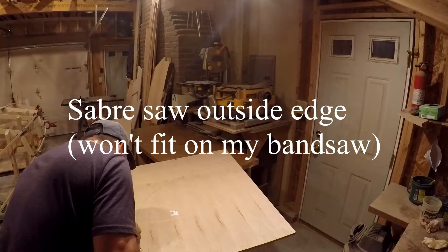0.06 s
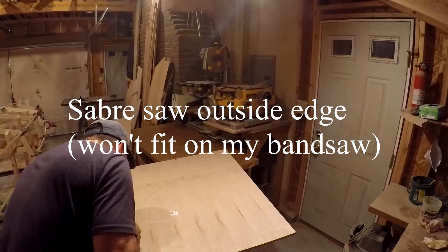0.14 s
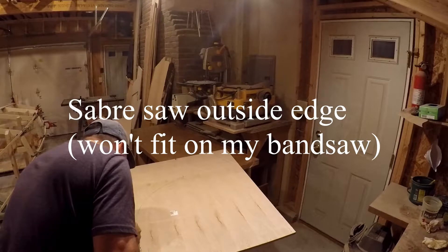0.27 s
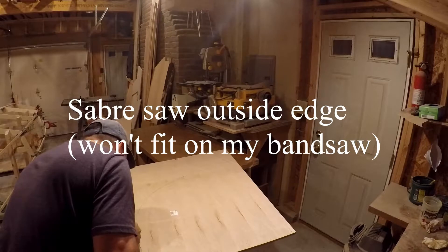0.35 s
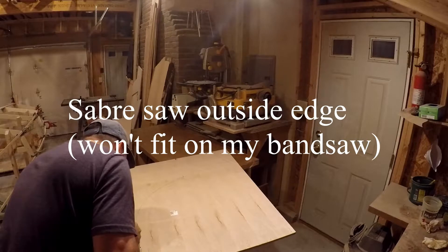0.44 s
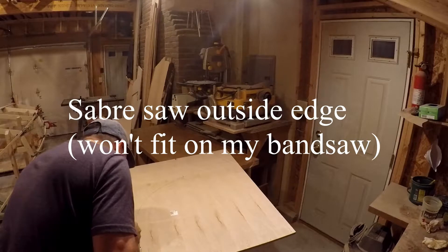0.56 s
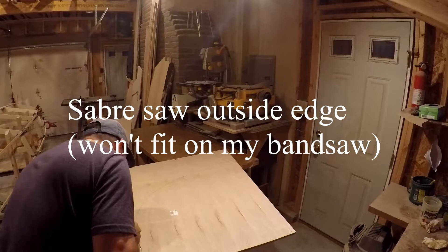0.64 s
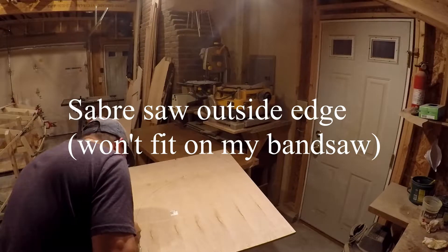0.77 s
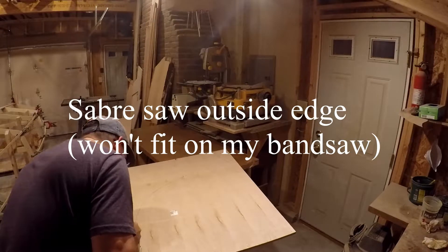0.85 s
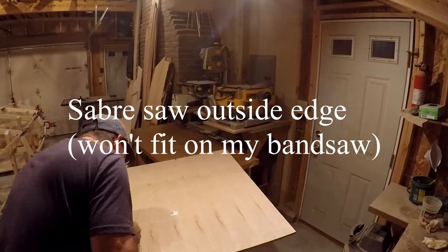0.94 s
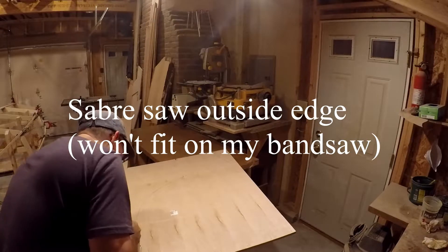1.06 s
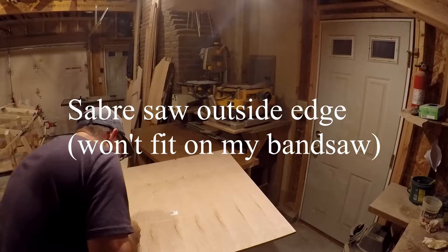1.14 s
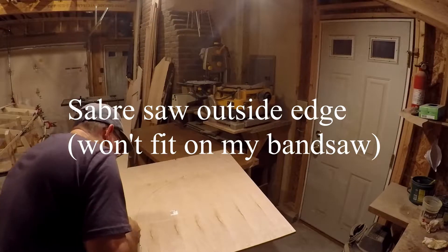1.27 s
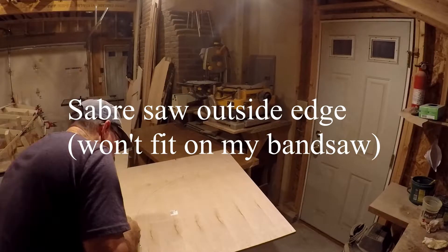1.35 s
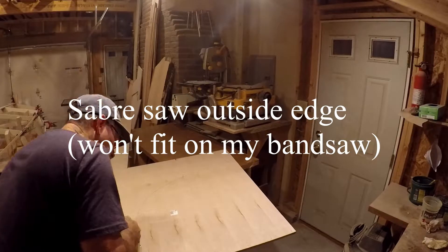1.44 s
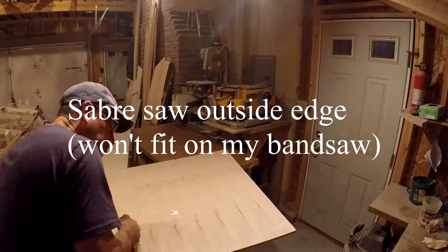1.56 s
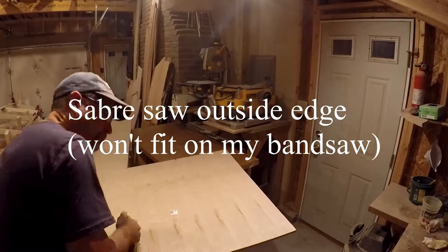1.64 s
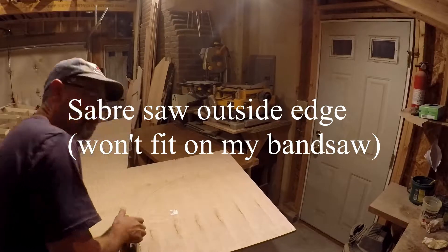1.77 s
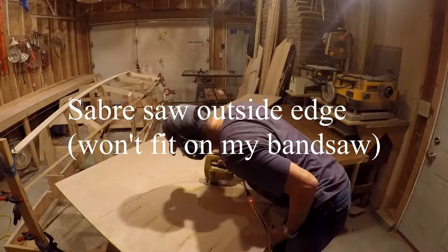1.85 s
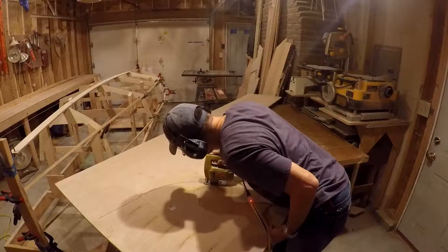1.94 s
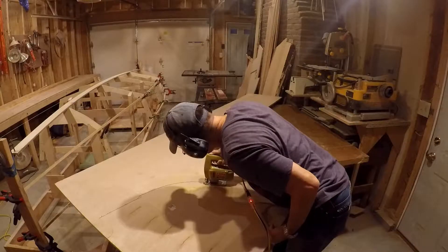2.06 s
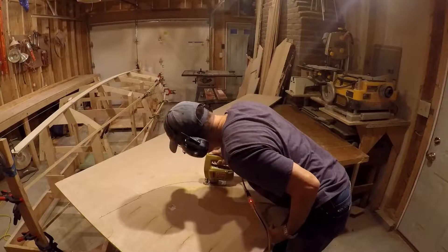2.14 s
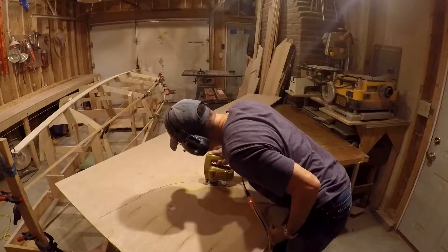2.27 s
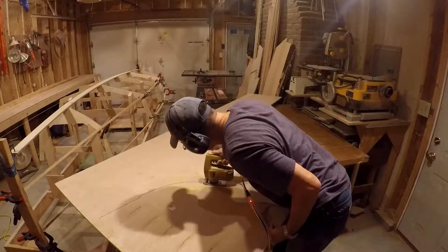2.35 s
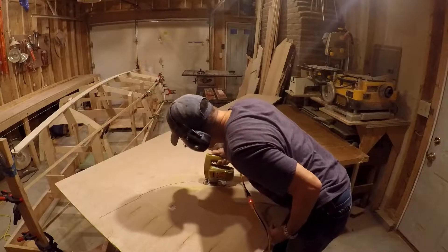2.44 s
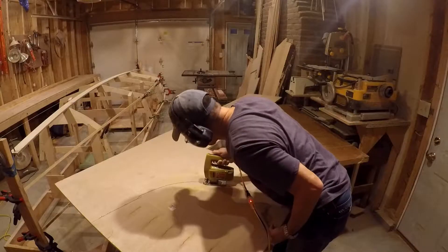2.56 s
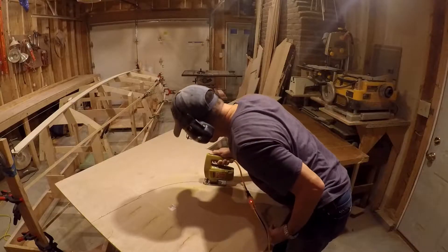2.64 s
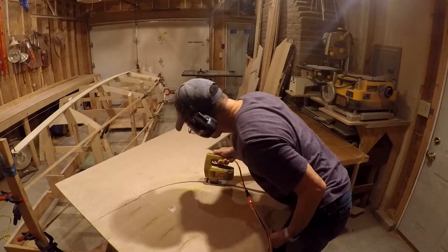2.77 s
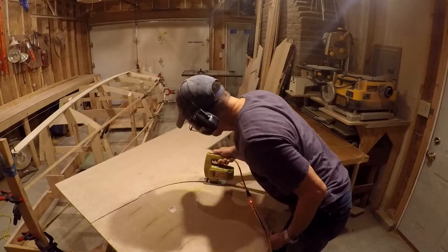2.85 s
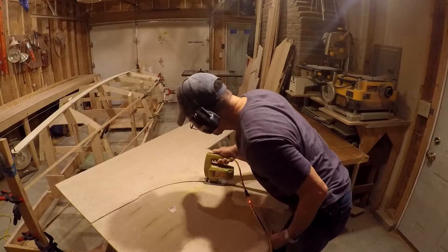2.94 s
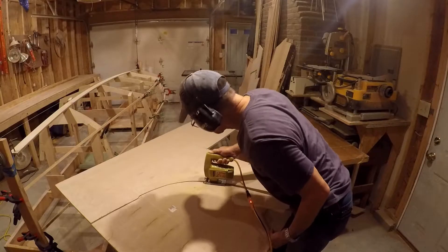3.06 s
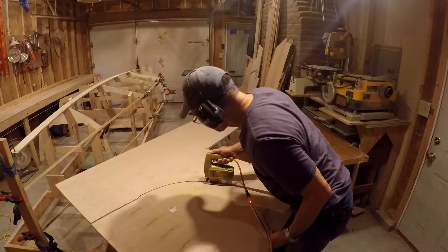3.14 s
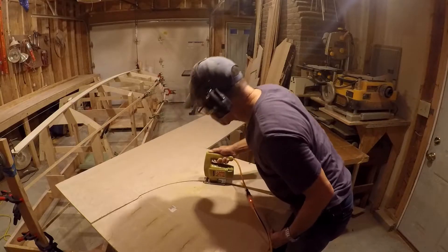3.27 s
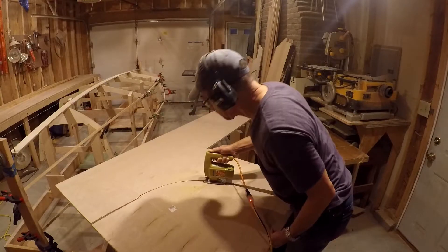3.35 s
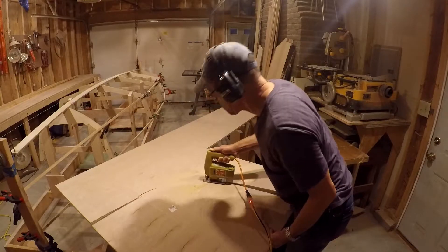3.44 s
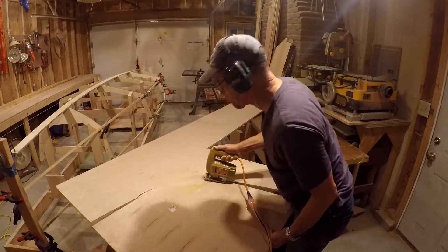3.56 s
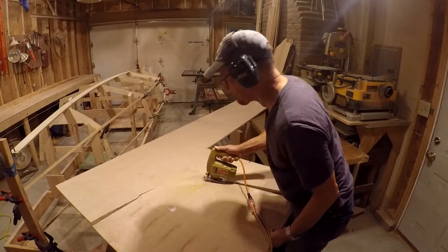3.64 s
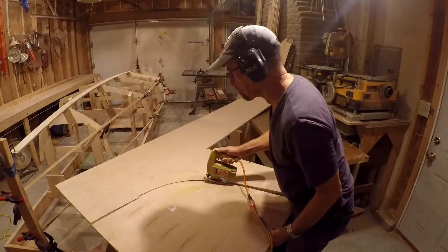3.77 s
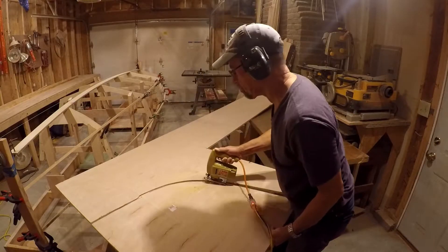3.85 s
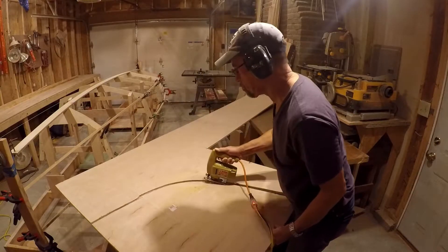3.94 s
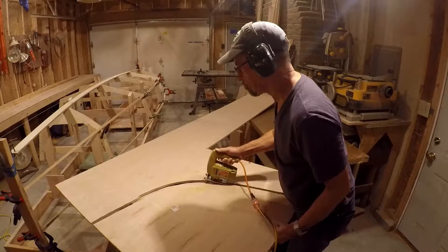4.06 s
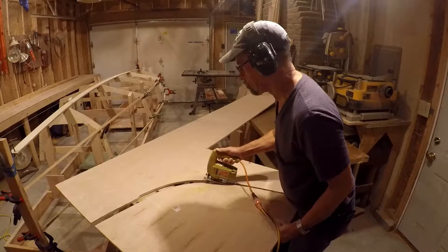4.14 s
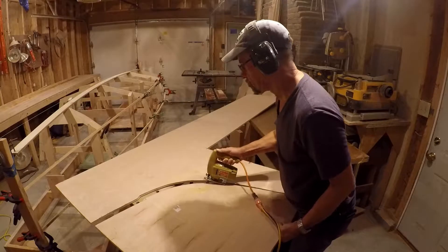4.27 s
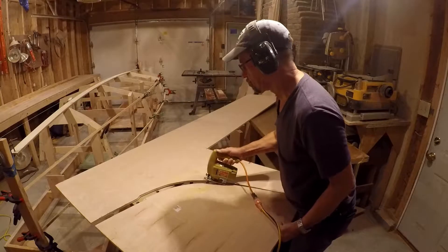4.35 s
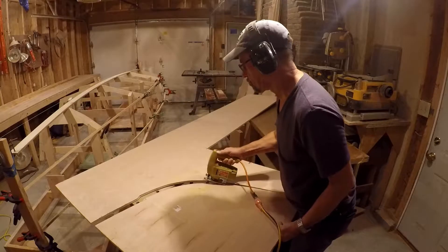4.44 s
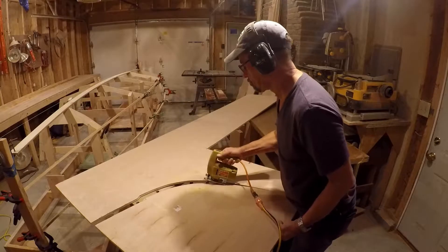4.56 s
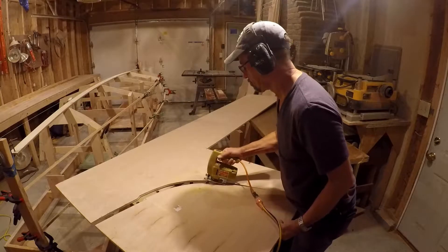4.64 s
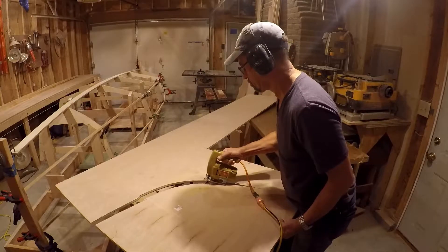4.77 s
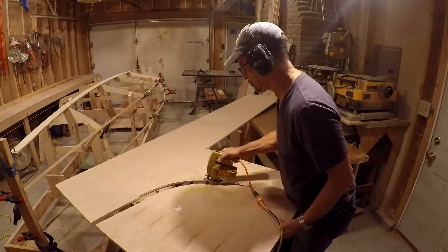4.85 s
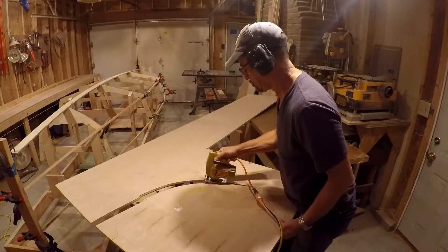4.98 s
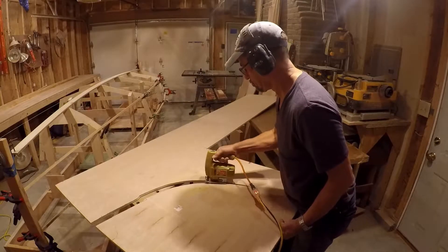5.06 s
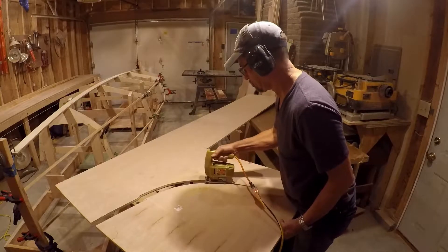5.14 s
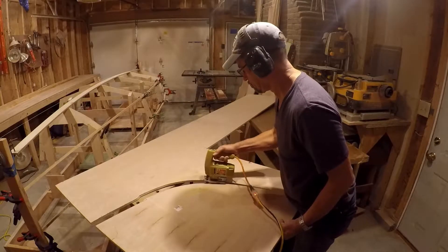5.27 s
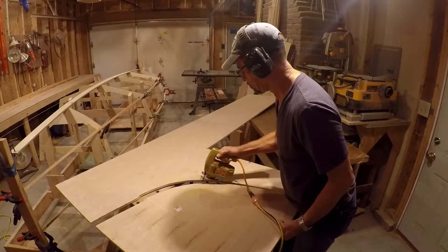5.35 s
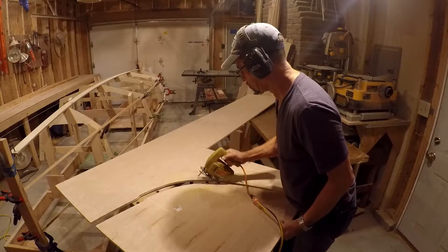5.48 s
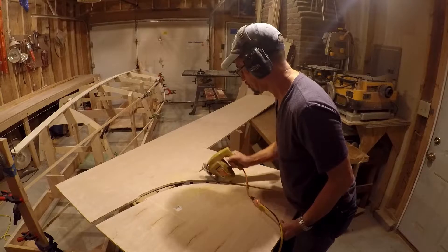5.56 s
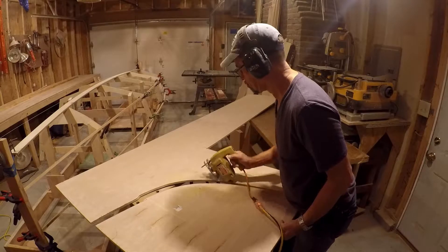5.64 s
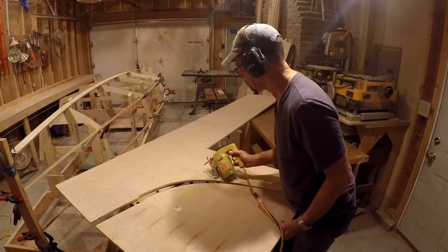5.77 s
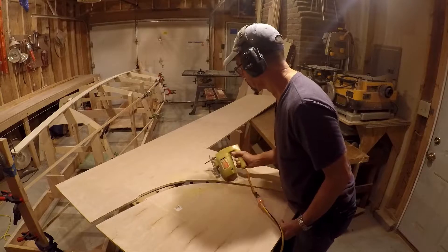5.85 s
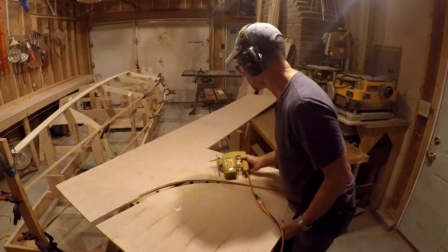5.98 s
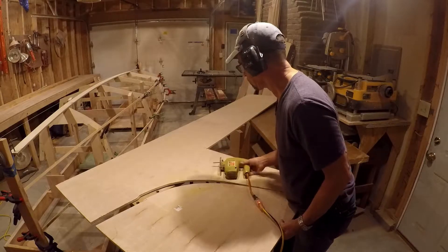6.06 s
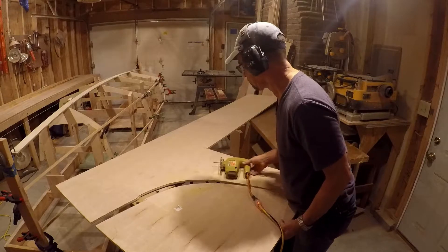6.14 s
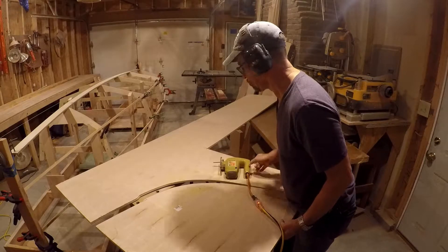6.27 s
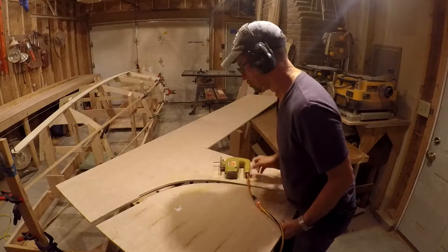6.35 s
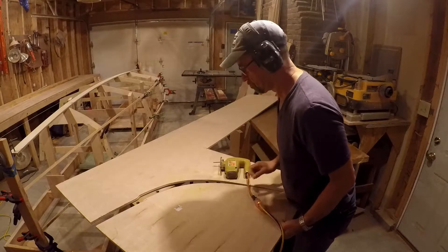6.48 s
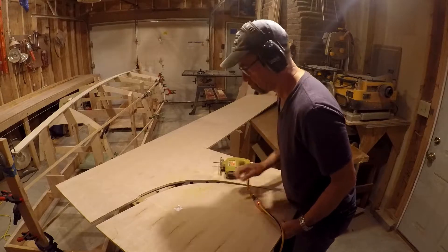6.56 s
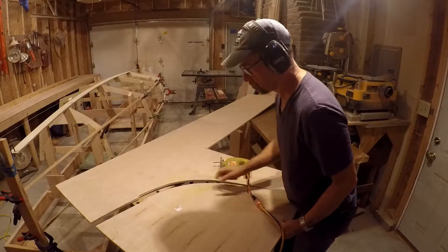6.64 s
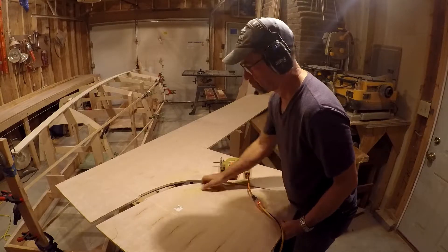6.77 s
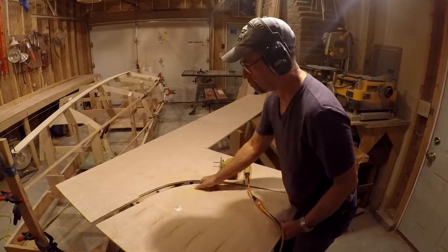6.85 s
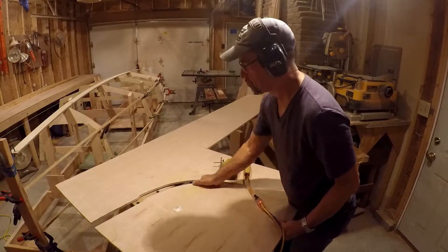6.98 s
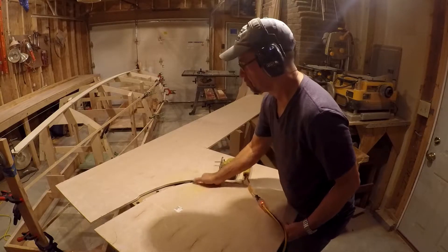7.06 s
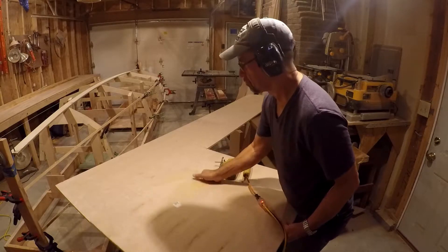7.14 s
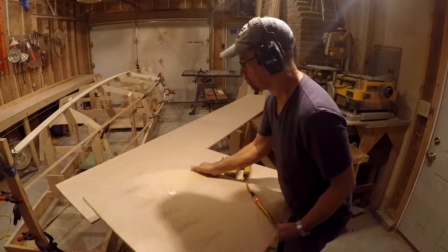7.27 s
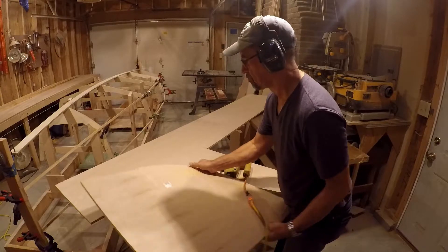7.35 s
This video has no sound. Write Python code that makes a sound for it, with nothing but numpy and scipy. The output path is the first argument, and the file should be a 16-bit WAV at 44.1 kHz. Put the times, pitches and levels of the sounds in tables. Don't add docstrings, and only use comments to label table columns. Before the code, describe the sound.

Loud buzzing jigsaw with droning gear whine coasts to a halt, cuts abruptly to another wind-down, then shuffling, small snaps and hard knocks on a wooden sheet.

```python
import sys
import numpy as np
from scipy import signal
from scipy.fft import rfft, irfft
from scipy.io import wavfile
from scipy.ndimage import uniform_filter1d

SR = 44100
rng = np.random.default_rng(int(sys.argv[2]) if len(sys.argv) > 2 else 0)


def nominal_scale(level):
    x = np.asarray(level, float) / 20
    return 10 ** x


def pcm_store(signal):
    levels = np.round(np.clip(np.atleast_2d(signal), -1, 1) * 32767)
    wavfile.write(sys.argv[1], SR, levels.astype(np.int16).T)


N = 326781
T = np.arange(N) / SR
JUMP_S = 1.806

# start_s, cutting_effort_db, chip_spray_db (over the effort)
CUTS = [
    [(0.0, -26, -1.5), (0.55, -25.5, -1.5), (1.02, -23.5, -2.5), (1.24, -26.5, -7), (1.29, -32, -8),
     (1.444, -44, -9), (1.502, -51, -15.5), (1.62, -68.5, -11.5), (1.8, -72, -6)],
    [(1.806, -29, -3), (1.82, -25, -5.5), (1.92, -23.5, -6), (2.17, -24, -7), (2.374, -28.5, -9),
     (2.5, -39, -5), (2.56, -47, 1), (2.62, -59.5, -2.5), (2.7, -74, 0)],
]


def evened(x):
    return x / np.sqrt(np.mean(x ** 2) + 1e-20)


def curve(rows, column=1, outside=None):
    rows = np.array(rows)
    return np.interp(T, rows[:, 0], rows[:, column], outside, outside)


def read(points, hz):
    f, value = np.transpose(points)
    return np.interp(np.log(hz + 1), np.log(f + 1), value)


def coloured(x, points):
    gain = nominal_scale(read(points, np.fft.rfftfreq(N, 1 / SR)))
    return evened(irfft(rfft(x) * gain, N))


def resonate(x, hz, width):
    turn = np.exp(2j * np.pi * np.cumsum(hz * np.ones(len(x))) / SR)
    r = np.exp(-np.pi * width / SR)
    return 2 * (turn * signal.lfilter([1 - r], [1, -r], x / turn)).real


def grit(per_s, spread_db, depth):
    sizes = nominal_scale(spread_db * np.minimum(rng.exponential(1, N), 5))
    grains = sizes * (rng.random(N) < per_s / SR)
    return evened(rng.standard_normal(N) * (1 + depth * signal.lfilter([1], [1, -.99], grains)))


def swell(start, rise, hold, db, fall_db_s):
    up = 13 * (np.clip((T - start) / max(rise, .002), 0, 1) - 1)
    return (T > start) * nominal_scale(db + up - fall_db_s * np.maximum(T - start - rise - hold, 0))


def add(mix, s, sound):
    part = mix[round(s * SR):][:len(sound)]
    part += sound[:len(part)]


def saw(speed, rows, layers, hiss, sheet):
    strokes_s = curve(speed)
    strokes = np.cumsum(strokes_s) / SR
    pace = np.clip(strokes_s / 36, 0, 1)
    full_db, rest_db, fan_over_db = layers
    shake_db = rest_db + (full_db - rest_db) * pace ** 2
    spray_db = curve(rows, 2)
    fan_db = spray_db + fan_over_db + 23.5 * (1 - pace)

    pattern = rng.standard_normal(1200)[(strokes % 1 * 1200).astype(int)]
    share = .3 * pace ** 8
    pulse = 1 + 0.067 * np.cos(4 * np.pi * strokes) + 0.05 * np.cos(2 * np.pi * strokes)
    chips = pulse * grit(600, 0.45, .3)
    drive = np.sqrt(share) * pattern + np.sqrt(1 - share) * chips
    shaking = sum(nominal_scale(db) * evened(resonate(resonate(chips, hz, w), hz, 3 * w)) for hz, w, db in sheet)

    bite = coloured(drive, hiss)
    dull = signal.filtfilt(*signal.butter(4, 4500, fs=SR), bite)
    fan = signal.filtfilt(*signal.butter(4, 9000, "high", fs=SR), bite)
    spray = bite - dull - fan
    cutting = evened(dull) + nominal_scale(spray_db) * evened(spray) + nominal_scale(fan_db) * evened(fan)
    effort = nominal_scale(curve(rows, 1, -150))
    return effort * (cutting + nominal_scale(shake_db - 3.0) * evened(shaking)), strokes


def motor(strokes):
    # start_s, level_db
    drone_db = [(0.0, -25), (0.046, -23.5), (0.6, -22.5), (0.65, -27.5), (1.02, -27.5), (1.06, -33),
                (1.14, -37), (1.2, -58)]
    # stroke_multiple, level_db
    orders = [(1, -36), (2, -19), (3, 2), (4, -21.5), (5, 1), (6, -35.5), (7, -24), (8, -47), (9, -54),
              (10, -15), (11, -15.5), (12, -23)]
    # start_s, level_db
    whine_db = [(0, -28), (.12, -26.5), (.25, -25), (.4, -27), (.52, -27.5), (.58, -24), (.77, -23.5),
                (.9, -25.5), (1.02, -26.5), (1.12, -40), (1.2, -60)]
    # stroke_multiple, loaded_db, eased_db
    teeth = [(7, -20, -10), (15, -10, -20), (19, -13, -20), (21, -11, -20), (23, -5, -11), (33, -7, -20),
             (35, -6, -20), (36, -9, -7), (38, -8, -20), (39, -8, -20), (40, -9, -14), (53, -14, -10),
             (55, -9, -8), (56, -2, 1), (57, 0, 4), (58, 3, -7), (59, -3, -1), (60, -7, -12), (61, -9, -7),
             (62, -15, -9), (68, -14, -3), (72, -3, -15), (74, -16, -7), (77, -8, -14), (78, -6, -12),
             (80, -16, -4), (82, -12, -7), (83, -6, -12), (84, -14, -5), (86, -8, -12), (91, -12, -6),
             (93, -8, -10)]
    turns = strokes[:3 * SR // 2]
    eased = np.interp(T[:len(turns)], [0.57, 0.64], [0, 1])
    phases = rng.random(len(orders))
    waver = [evened(signal.lfilter([1], [1, -.999], rng.standard_normal(len(turns)))) for _ in teeth]

    drone = np.zeros(len(turns))
    for (k, db), phase, w in zip(orders, phases, waver):
        level_db = db - (eased if k == 5 else 0)
        depth = .8 if k > 5 else .04
        gain = nominal_scale(level_db) * (1 + depth * uniform_filter1d(w, size=1500))
        drone += gain * np.sin(2 * np.pi * (k * turns + phase))
    whine = np.zeros(len(turns))
    for (k, db, free_db), w in zip(teeth, waver):
        gain = nominal_scale(db + (free_db - db) * eased) * (1 + .25 * w)
        whine += gain * np.sin(2 * np.pi * (k * turns + k * k / 8))
    drone, whine = (np.pad(evened(x), (0, N - len(turns))) for x in (drone, whine))
    return nominal_scale(curve(drone_db, 1, -150)) * drone + nominal_scale(curve(whine_db, 1, -150)) * whine


def rotor():
    # start_s, pitch_hz, level_db
    glides = [
        [(.95, 1950, -49), (1.0, 1930, -29.5), (1.1, 1410, -34.5), (1.2, 1060, -37), (1.4, 990, -42),
         (1.5, 900, -55)],
        [(1.15, 1550, -47), (1.27, 1480, -31.5), (1.4, 1360, -63)],
        [(1.19, 930, -55), (1.26, 890, -39), (1.31, 870, -54)],
        [(1.06, 430, -51), (1.09, 425, -32), (1.16, 415, -33), (1.2, 410, -52)],
        [(1.22, 365, -55), (1.278, 364, -30), (1.31, 370, -52)],
        [(1.81, 2180, -32), (1.86, 1930, -28), (1.93, 1720, -33), (2.02, 1600, -48)],
        [(1.83, 2620, -40), (1.89, 2600, -33), (1.97, 2630, -37)],
        [(.7, 3120, -65), (.8, 3140, -44), (.88, 3080, -43)],
        [(.86, 1400, -47), (.93, 1370, -35), (.99, 1410, -57)],
        [(1.82, 624, -50), (1.88, 570, -29.5), (1.95, 550, -31), (2.0, 420, -35.5), (2.06, 400, -32),
         (2.15, 352, -29.5), (2.2, 338, -44), (2.4, 260, -59)],
        [(2.06, 200, -58), (2.12, 264, -33), (2.18, 267, -36), (2.25, 400, -57), (2.29, 406, -42),
         (2.34, 425, -44)],
        [(1.3, 420, -45), (1.37, 440, -39.5), (1.44, 400, -55)],
    ]
    noise = rng.standard_normal(5 * SR // 2)
    hum = np.zeros(len(noise))
    for rows in glides:
        pitch_hz = curve(rows)[:len(noise)]
        blur_hz = .05 * rows[1][1]
        hum += nominal_scale(curve(rows, 2, -150)[:len(noise)]) * evened(resonate(noise, pitch_hz, blur_hz))
    return np.pad(hum, (0, N - len(noise)))


def thumps():
    # start_s, level_db
    slow_strokes = [
        (1.442, -37),
        (1.538, -41),
        (1.634, -37.5),
        (1.735, -38),
        (2.308, -28),
        (2.399, -29),
        (2.496, -30),
        (2.598, -34),
    ]
    out, u = np.zeros(N), np.arange(4000) / SR / 0.0033
    for s, db in slow_strokes:
        add(out, s, nominal_scale(db) * u * (2 - u) * np.exp(-u) * 2)
    return out


def knocks():
    # start_s, level_db, ring_hz, ring_t60_s, clatter_db
    blows = [(2.696, -28, 128, 0.14, -19), (2.743, -32.5, 190, 0.17, -25), (2.692, -44, 445, 0.27, -7),
             (3.392, -33.5, 219.4, 0.27, -10), (3.499, -42, 144, 0.074, -22), (3.557, -35.5, 186, 0.084, 6),
             (3.662, -23, 426, 0.017, -16), (3.664, -44, 598, 0.14, -11), (3.937, -27.5, 243, 0.02, -6.5),
             (5.338, -11.5, 407, 0.012, -26.5), (5.342, -23, 850, 0.036, -23), (5.359, -26, 257, 0.064, -3),
             (5.41, -32.5, 578, 0.21, -9), (5.506, -23.5, 524, 0.035, -4.5), (5.51, -22, 298, 0.034, -16),
             (5.522, -20.5, 259, 0.095, -20), (5.548, -30.5, 573, 0.2, -12), (5.505, -31, 1460, 0.068, -21),
             (5.584, -28.5, 185, 0.16, -29), (5.617, -28, 242, 0.033, -28), (5.656, -30.5, 502, 0.078, -3),
             (5.66, -36.5, 1290, 0.055, -4), (5.938, -31.5, 413, 0.035, -19),
             (5.942, -38.5, 880, 0.034, -22), (6.001, -22, 198, .04, -27), (6.009, -11.5, 480, 0.02, -1.5),
             (6.021, -20, 205.7, 0.34, -11), (6.026, -18, 258.5, 0.17, -10), (6.026, -16, 1200, 0.051, -9),
             (6.041, -17.5, 2230, 0.026, -3), (6.072, -23, 1220, 0.085, -11), (6.0112, -22, 2250, 0.04, -1),
             (6.055, -25, 850, 0.16, -7), (6.092, -24, 276, 0.055, 3), (6.712, -31, 403, 0.06, 3),
             (6.728, -40, 225, 0.074, -8), (6.739, -43, 300, 0.036, -8), (6.798, -32, 198, 0.034, -20)]
    # pitch_hz, level_db, t60_s
    modes = [(160, -18, .15), (212, -8, .18), (258, -3, .2), (400, -6, .1), (565, -9, .12), (856, -6, .08),
             (1100, -12, .06), (1373, -16, .06), (1658, -12, .05), (2750, -15, .04), (3200, -16, .04)]
    # pitch_hz, level_db per Hz
    clatter_colour = [(120, -5.5), (200, -3.5), (682, -8), (1200, -9.5), (1600, -10), (2300, -16.5),
                      (3200, -24), (4250, -36.5), (7250, -32), (14000, -81)]
    out, clatter, t = np.zeros(N), np.zeros(N), np.arange(SR // 2) / SR
    for s, db, hz, t60, clatter_db in blows:
        blow = rng.standard_normal(2000) * (rng.random(2000) < .004) * np.exp(-t[:2000] / 0.0015)
        blow[0] = 1
        shifts = rng.uniform(.975, 1.025, len(modes))
        panel = sum(nominal_scale(d - 60 * t / long) * np.sin(2 * np.pi * f * t * shift)
                    for (f, d, long), shift in zip(modes, shifts))
        panel = (1 - np.exp(-t / 0.0042)) * signal.fftconvolve(blow, panel)[:len(t)]
        local = nominal_scale(-60 * t / max(t60, .01)) * np.sin(2 * np.pi * hz * t)
        add(out, s, nominal_scale(db) * (local + nominal_scale(-12.5) * panel))
        add(clatter, s, nominal_scale(db + clatter_db - 8.0) * np.exp(-t / 0.028) * np.minimum(t / 0.0016, 1))
    out += clatter * coloured(rng.standard_normal(N), clatter_colour)
    return signal.sosfilt(signal.butter(6, 135, "high", fs=SR, output="sos"), out)


def ticks():
    # start_s, level_db
    snaps = [(2.782, -48), (3.115, -57), (3.445, -48), (3.494, -37), (3.37, -58), (3.428, -44),
             (3.4796, -43), (3.554, -45), (3.845, -58), (3.9345, -60), (3.9874, -47), (4.062, -52),
             (4.064, -47), (6.953, -50), (4.088, -53), (4.122, -45), (7.002, -51), (7.068, -45),
             (4.8205, -36.5), (4.903, -40.5), (4.9836, -61), (5.252, -45), (5.4813, -38.5), (6.0119, -23.5),
             (6.7125, -43.5), (6.7405, -45), (6.9306, -46), (6.9459, -39.5), (5.338, -56), (5.506, -54),
             (5.657, -58), (6.777, -44), (6.79, -44), (5.713, -71), (6.73, -49), (7.06, -44), (7.212, -51)]
    # pitch_hz, level_db per Hz
    snap_colour = [(880, -6), (2500, 0), (5000, 0), (7000, 5), (8200, -7), (11000, -19), (15000, -45)]
    burst, t = np.zeros(N), np.arange(900) / SR
    for s, db in snaps:
        add(burst, s, nominal_scale(db + 0.5) * (np.exp(-t / .0012) + nominal_scale(-12) * np.exp(-t / .006)))
    return burst * coloured(rng.standard_normal(N), snap_colour)


def squeaks():
    # start_s, length_s, pitch_hz, level_db
    whistles = [
        (4.973, 0.085, 2450, -56.5),
        (5.338, 0.17, 2560, -58.5),
        (5.389, 0.12, 7000, -57),
        (5.56, 0.021, 6680, -55),
        (3.389, 0.23, 870, -51),
        (3.445, 0.17, 1640, -56),
        (3.483, 0.136, 2280, -50),
        (5.292, 0.036, 1900, -52),
        (5.403, 0.1, 3220, -63),
    ]
    out, blur_hz = np.zeros(N), 170
    for s, length, hz, db in whistles:
        noise = rng.standard_normal(round(length * SR))
        whistle = evened(resonate(resonate(noise, hz, blur_hz), hz, 2 * blur_hz))
        add(out, s, nominal_scale(db) * whistle * signal.windows.tukey(len(noise), .3))
    return out


def scrapes():
    # start_s, swell_s, hold_s, rub_db, fizz_db
    rubs = [(2.647, 0.13, 0.025, -42.5, -58), (3.31, 0.09, 0.099, -43.5, -58.5),
            (3.401, 0.12, 0.034, -34, -65), (3.917, 0.012, 0.092, -52, -58.5),
            (3.956, 0.097, 0.045, -44, -48), (4.802, 0.0093, 0.0087, -41.5, -62),
            (4.847, 0.06, 0.03, -40.5, -77), (5.209, 0.033, 0.046, -36, -57), (5.294, .02, .03, -45, -73),
            (5.384, 0.028, 0.032, -46, -57), (5.52, 0.03, 0.013, -40.5, -47),
            (5.554, 0.0067, 0.006, -71, -78), (5.83, 0.014, 0.11, -74, -65.5),
            (6.71, 0.0048, 0.048, -33.5, -49.5), (6.887, 0.02, .005, -57, -55.5),
            (7.053, 0.0044, 0.0065, -104, -54), (7.187, .04, .2, -57, -64)]
    # pitch_hz, level_db per Hz
    rub_colour = [(88, -51), (150, 0.5), (403, -2.5), (702, -13.5), (913, -5.5), (1190, -18), (1320, -13.5),
                  (1770, -11), (5060, -26.5), (6000, -24), (7800, -25), (13200, -120)]
    fizz_colour = [(880, -1.5), (1500, 2), (2000, 4), (2600, 4.5), (4800, 4), (6420, 9.5), (7560, 10.5),
                   (8490, -14), (9440, -1), (15000, -50)]
    idle = T > rubs[0][0]
    rub = idle * nominal_scale(-57.5) + sum(swell(s, up, hold, db, 135) for s, up, hold, db, _ in rubs)
    fizz = idle * nominal_scale(-90.5) + sum(swell(s, up, hold, db, 206) for s, up, hold, _, db in rubs)
    dull, bright = grit(300, 1.3, .6), grit(700, 2.1, .5)
    return rub * nominal_scale(-6.0) * coloured(dull, rub_colour) + fizz * coloured(bright, fizz_colour)


def room(x):
    # pitch_hz, t60_s
    decay = [(100, .6), (260, .55), (700, .5), (1840, .45), (4850, .33), (10000, .2)]
    taps = np.zeros(SR)
    at = np.arange(200, SR - 20, 20)
    taps[at + rng.integers(0, 20, len(at))] = rng.choice([-1., 1.], len(at))
    hz, t, z = signal.stft(taps, SR, nperseg=256)
    tail = signal.istft(z * nominal_scale(-60 * t / read(decay, hz)[:, None]), SR, nperseg=256)[1]
    return signal.fftconvolve(x, tail / np.linalg.norm(tail))[:N]


def air():
    # pitch_hz, level_db per Hz
    tone_colour = [(15, -55), (25, -18.5), (101, -30), (125, -18), (146, 1), (186, -0.5), (250, -1.5),
                   (285, -9), (318, -10.5), (373, -11.5), (415, -15), (927, -17.5), (2560, -35),
                   (9250, -38.5), (15000, -49.5)]
    # peak_s, level_db, fade_db_per_s
    shifts = [
        (1.46, -47, 3.5),
        (2.72, -34.5, 29),
        (3.46, -32.5, 78),
        (3.96, -47, 150),
        (5.49, -70, 36),
        (6.1, -51, 19),
        (6.75, -47, 58),
        (7.08, -62, 72),
    ]
    rumble_colour = [(15, -50), (30, -5.0), (80, -0.5), (120, 1.5), (300, -72)]
    rumble = coloured(rng.standard_normal(N), rumble_colour)
    effort = sum(nominal_scale(curve(rows, 1, -150)) for rows in CUTS)
    tone = nominal_scale(np.where(T < JUMP_S, -52, -44.5)) + nominal_scale(-16.5) * effort
    rise_s = 0.095
    sway = sum(swell(s - rise_s, rise_s, 0, db, fall) for s, db, fall in shifts)
    sway = sway + nominal_scale(-78) + nominal_scale(-13.5) * effort
    return nominal_scale(-2.5) * tone * coloured(rng.standard_normal(N), tone_colour) + nominal_scale(-8.5) * sway * rumble


def scene():
    # start_s, strokes_per_s
    speeds = [
        [(0.0, 36.3), (0.05, 35.9), (0.26, 35.6), (0.49, 35.7), (.585, 35.75), (0.625, 36.75), (.8, 37.0),
         (0.87, 37.42), (1.01, 37.5), (1.1, 37.9), (1.25, 33), (1.4, 20), (1.8, 9)],
        [(1.8, 32), (2.1, 32), (2.3, 25), (2.45, 14), (2.7, 9)],
    ]
    # shaking_db at full speed and shaking_db at rest (over effort), fan_db (over spray)
    balances = [
        (-7, 0, -15),
        (-8, 0, -17.5),
    ]
    # pitch_hz, level_db per Hz
    colours = [
        [(350, -29.5), (600, -2.5), (705, -13), (840, -7.5), (961, -11.5), (1210, -8), (1650, -10), (2100, -7), (2370, -5.5), (3060, -5.5), (4900, -21), (7340, -14), (8740, -29), (10700, -34), (11200, -42), (14200, -47), (15000, -61)],
        [(350, -55), (600, 0), (705, -2.5), (923, 4), (1010, -0.5), (1620, 3.5), (2020, 1), (2160, 1.5), (2370, 2.5), (5460, -8.5), (7440, -2), (8400, -15.5), (10700, -28), (11300, -39), (13100, -33), (15000, -47)],
    ]
    # pitch_hz, width_hz, level_db
    sheets = [
        [(75, 23, -10), (119, 45, -4), (185, 10.4, -2), (243, 38, -6), (386.4, 9.6, -9), (425, 21, -13.5), (570, 75, -25)],
        [(94, 12, 9), (190, 16, 7), (243, 23, 9), (320, 22, -10), (385, 24, 6), (502, 24, 3.5), (561.5, 13, 2)],
    ]
    runs = zip(speeds, CUTS, balances, colours, sheets)
    (first, strokes), (second, _) = (saw(*run) for run in runs)
    tool = first + second + motor(strokes) + rotor() + thumps()
    hits = knocks() + ticks()
    return (tool + hits + nominal_scale(-7.0) * room(hits) + squeaks() + scrapes() + air())[None]


def streaked(x):
    # pitch_hz, share_lost 0-1
    strip_share = [(9000, .04), (10600, .12), (11100, .45), (11600, .2), (13600, .25), (14100, .5),
                   (15000, .45)]
    hz, _, z = signal.stft(x, SR, nperseg=1024)
    chance = rng.standard_normal(z.shape[::-1]).T
    chance = uniform_filter1d(uniform_filter1d(chance, size=6, axis=1), size=3, axis=0)
    rank = chance.ravel().argsort().argsort().reshape(z.shape) / z.size
    top = (hz > 9000)[:, None]
    share = read(strip_share, hz)[:, None]
    gain = np.where((rank < share) & top, nominal_scale(-14), 1 + share * top / 2)
    return signal.istft(z * gain, SR, nperseg=1024)[1][:N]


def thinned(x):
    # centre_s, from_hz, share_lost 0-1
    moments = [(0.11, 1000, 0), (0.502, 1000, 0.23), (0.828, 900, 0.3), (1.105, 2040, 0.2),
               (1.128, 1000, 0.2), (1.338, 4000, 0.6), (2.188, 3500, 0.22), (2.23, 2480, 0.21),
               (3.08, 1520, 0.7), (3.196, 1800, 0.33), (6.668, 2000, 0.24), (6.768, 1000, 0.2),
               (4.763, 2000, 0), (4.025, 2500, 0), (1.675, 1930, 0.6), (1.692, 1930, 0.6),
               (1.943, 1000, 0.32), (3.633, 4600, 0.24), (2.314, 3000, 0.17), (2.642, 1000, 0.43),
               (2.824, 3700, 0.6), (3.463, 4200, 0.56), (3.428, 3830, 0.76), (3.555, 2500, 0.26),
               (3.823, 2100, 0.63), (4.231, 2500, 0.6), (5.239, 3900, 0.26), (5.404, 1000, 0.4),
               (5.564, 1500, 0.37), (5.588, 3800, 0.5), (5.611, 3780, 0.75), (5.866, 2980, 0.2),
               (5.914, 1700, 0.64), (6.122, 4000, 0.7), (6.238, 3100, 0.6), (6.569, 2220, 0.64),
               (6.582, 2200, 0.78), (1.03, 7000, 0.73), (1.26, 6000, 0.3), (1.478, 3500, 0.5),
               (1.508, 4000, 0.5), (1.87, 7500, 0.5), (6.64, 3500, .3), (6.925, 2000, 0.25),
               (6.883, 2500, 0.3), (6.981, 1110, 0.5), (7.028, 1100, 0.4), (7.174, 3600, 0.3)]
    out, hz = x.copy(), np.fft.rfftfreq(2048, 1 / SR)
    centres = np.arange(1674, N - 1024, 2048) / SR
    mild = [(s, 2500, .14) for s in centres if rng.random() < 2 / 11 and abs(s - JUMP_S) > .05]
    for s, low_hz, lost in [*mild, *moments]:
        z = rfft(out[round(s * SR) - 1024:][:2048] * signal.windows.hann(2048) ** 2)
        strip = uniform_filter1d(abs(z), size=4) / (uniform_filter1d(abs(z), size=40) + 1e-12)
        kept = strip > np.quantile(strip, min(.38 + .7 * lost, .96))
        kept = kept * np.where((hz < 8500) | (lost < .2), 1, .1)
        add(out, s - 1024 / SR, irfft(z * (hz > low_hz) * (1.3 * kept - 1)))
    return out


def band_limit(x):
    return signal.sosfilt(signal.butter(12, 15130, fs=SR, output="sos"), x)


def record(dry):
    power_db = 10 * np.log10(abs(uniform_filter1d(dry[0] ** 2, size=600)) + 1e-12)
    fall = T * 75.0
    over_db = np.maximum(np.maximum.accumulate(power_db + fall) - fall + 24.0, 0)
    held = dry[0] / nominal_scale(0.26 * uniform_filter1d(over_db, size=200))
    held = signal.oaconvolve(held, signal.firwin(255, 15300, fs=SR), "same")
    mix = thinned(streaked(held))[None]
    return band_limit(mix)


dry = scene()
out = record(dry)
pcm_store(out)
```